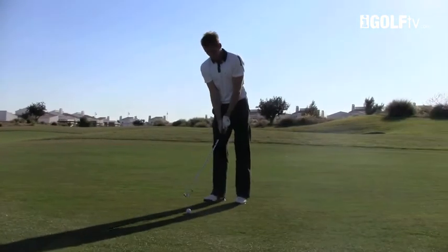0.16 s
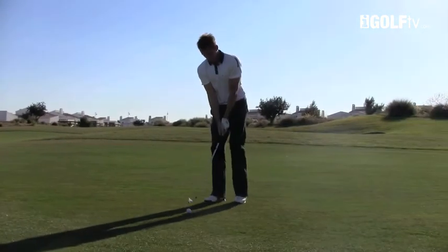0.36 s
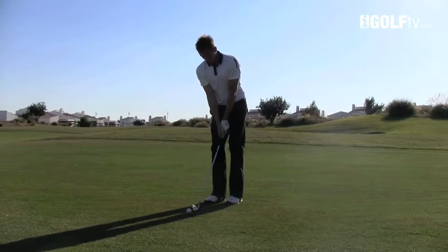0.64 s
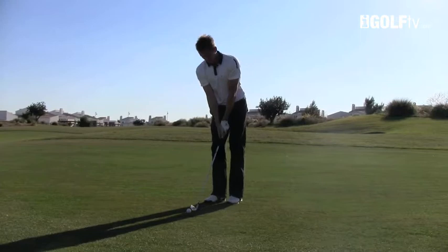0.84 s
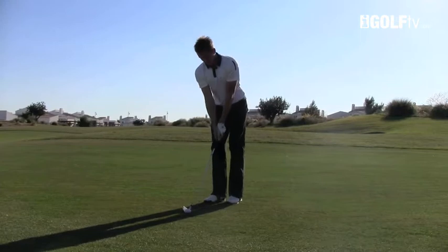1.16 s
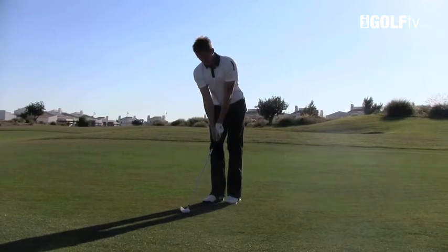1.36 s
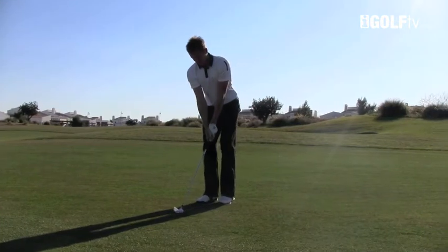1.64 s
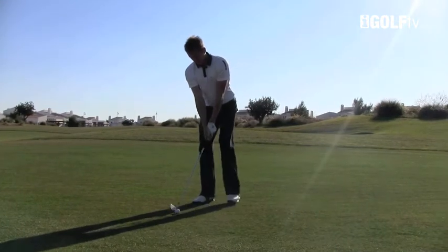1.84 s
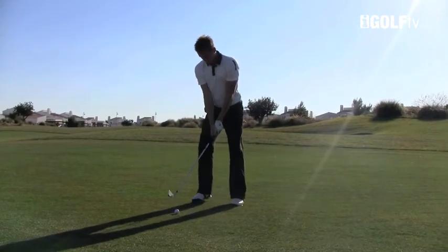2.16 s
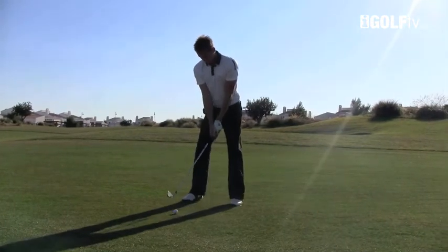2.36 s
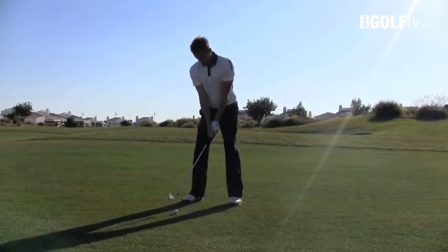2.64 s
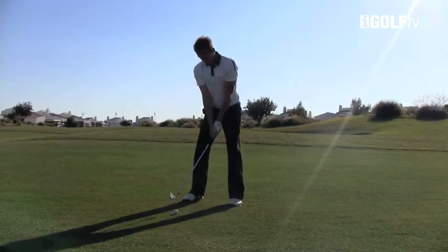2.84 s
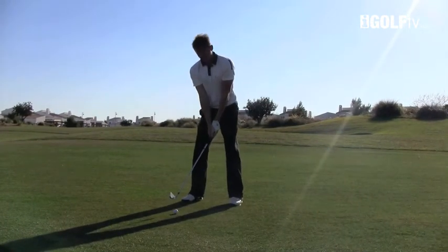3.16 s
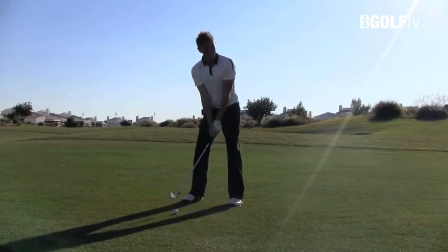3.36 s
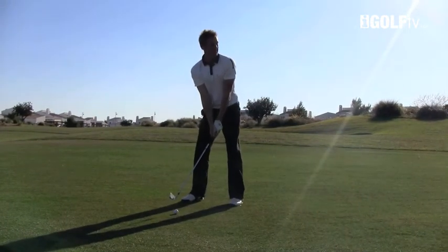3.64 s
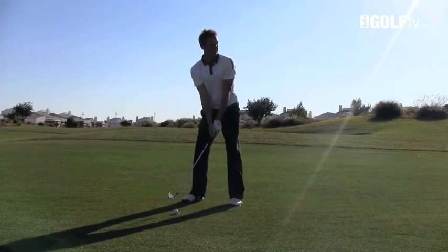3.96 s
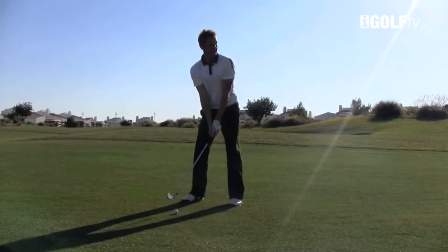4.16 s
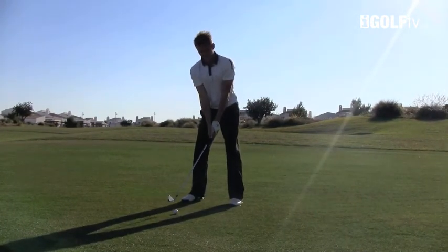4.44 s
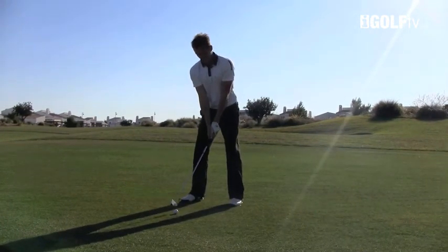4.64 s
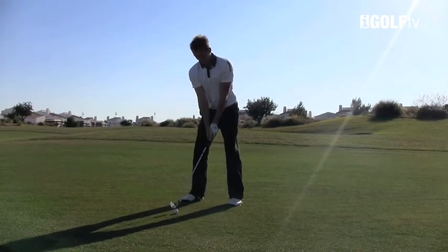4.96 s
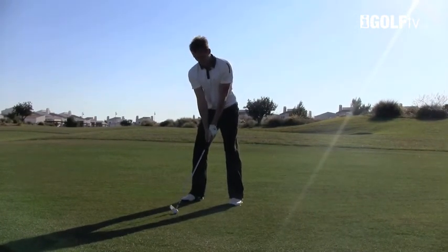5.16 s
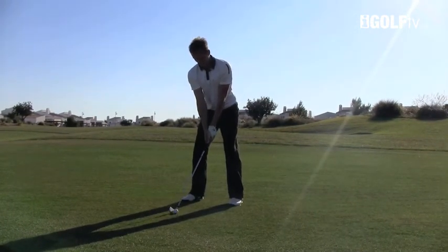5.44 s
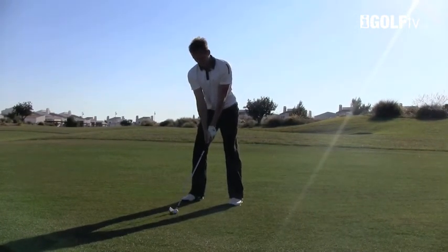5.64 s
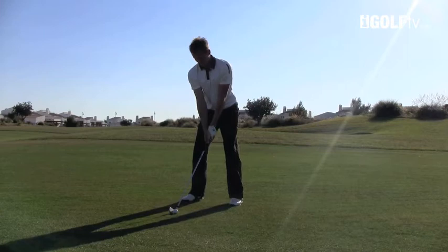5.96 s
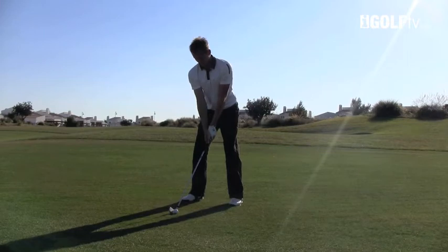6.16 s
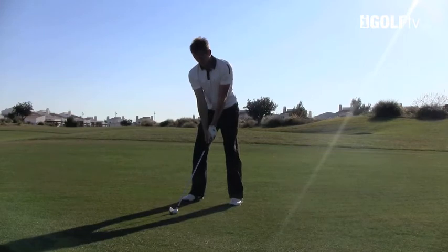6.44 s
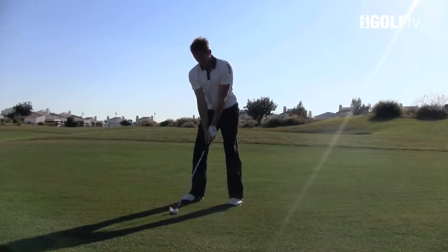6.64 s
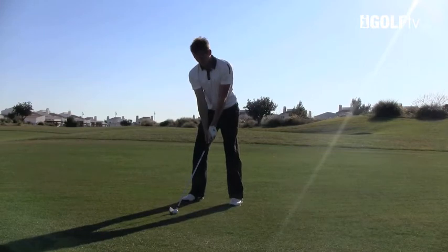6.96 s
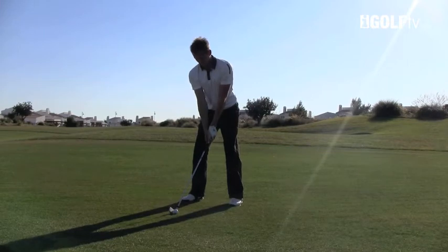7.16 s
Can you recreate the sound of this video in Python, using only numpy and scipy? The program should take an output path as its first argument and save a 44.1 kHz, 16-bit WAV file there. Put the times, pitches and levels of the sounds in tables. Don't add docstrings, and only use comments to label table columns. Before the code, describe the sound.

A small microphone on a golfer's shirt picks up deep, uneven wind rumble from start to finish. Tiny ticks open it, then cloth rubs and dull knocks, shoes brush the turf, and a rubber grip squeaks thinly under a glove. Around two and a half seconds stronger gusts thump. Later movement settles, a far bird rasps faintly, and wind and hiss carry on in the open field, with no shot struck.

```python
import sys
import numpy as np
from scipy import signal
from scipy.fft import rfft, irfft, next_fast_len
from scipy.io import wavfile
from scipy.ndimage import uniform_filter1d

SR = 44100
rng = np.random.default_rng(int(sys.argv[2]) if len(sys.argv) > 2 else 0)


def log_audio(samples):
    frames = np.atleast_2d(samples).T
    limited = np.clip(frames, -1, 1)
    pcm = np.round(limited * 32767).astype(np.int16)
    wavfile.write(sys.argv[1], SR, pcm)


def natural_amplitude(level_db):
    exponent = np.asarray(level_db, float) / 20
    return 10 ** exponent


N = 322371
TIME = np.arange(N) / SR


def level(x, db):
    return x * natural_amplitude(db) / np.sqrt(np.mean(x ** 2))


def colour(x, points):
    hz, db = np.transpose(points)
    size = next_fast_len(len(x))
    freq = np.maximum(np.fft.rfftfreq(size, 1 / SR), 1)
    gain = natural_amplitude(np.interp(np.log(freq), np.log(hz), db))
    return irfft(rfft(x, size) * gain, size)[:len(x)]


def band(x, hz, width):
    edges = np.clip([hz - width / 2, hz + width / 2], 20, 0.45 * SR)
    return signal.sosfilt(signal.butter(2, edges, "bandpass", fs=SR, output="sos"), x)


def walk(rate):
    hold = int(SR / rate)
    steps = np.repeat(rng.standard_normal(N // hold + 1), hold)
    steps = uniform_filter1d(uniform_filter1d(steps, hold), hold)[:N]
    return steps / steps.std()


def even(x, span_s):
    span = int(span_s * SR)
    power = uniform_filter1d(uniform_filter1d(x ** 2, span), span)
    return x / np.sqrt(power + 1e-18)


def curves(table):
    s, *columns = np.transpose(table)
    return [np.interp(TIME, s, column) for column in columns]


def add(out, start_s, piece):
    at = int(start_s * SR)
    out[at:at + len(piece)] += piece[:N - at]


def fibres(spread_db):
    return rng.standard_normal(N) * natural_amplitude(spread_db * rng.exponential(size=N))


def wind():
    # (time [s], wind strength [dB], share of small eddies [dB])
    gusts = [(0.0, -39.5, -3), (0.35, -34, -4), (0.65, -46.5, -5.5), (0.89, -37, -2), (2.32, -36.5, -1),
             (2.5, -29, 5), (2.89, -35.5, -1), (3.09, -32, 2.5), (3.36, -35.5, -2), (3.7, -33.5, 1.5),
             (4.17, -42.5, -0.5), (5.48, -32.5, 1), (5.6, -42, 1.5), (5.84, -31.5, -1), (6.19, -33.5, -4),
             (6.6, -33, 2), (6.94, -36.5, 2.5), (7.31, -38.5, 2)]
    # (frequency [Hz], density [dB per Hz])
    wind_spectrum = [(8.8, -38), (15, -5), (38, 5.5), (75, 0.5), (140, -10), (380, -32.5), (700, -51),
                     (910, -51), (1540, -120)]
    # (middle [s], length [s], large eddies [dB], smaller eddies [dB])
    lulls = [(0.267, 0.29, 0, 8.5), (1.05, 0.19, -3.5, -8), (1.3, .15, -1, -1), (1.444, 0.13, -6, -0.5),
             (1.66, 0.056, -2, -3), (1.78, 0.11, -1.5, 3), (1.994, 0.068, -5.5, -6),
             (2.162, 0.069, -6, -10), (2.75, .1, -6, 4), (2.918, 0.093, -7, -5), (3.37, 0.062, -8, 0),
             (3.665, 0.094, -2, 2), (3.74, 0.05, -11, -1), (4.05, 0.091, 0, -2), (4.28, 0.11, -4.5, -3),
             (4.49, 0.073, -1.5, 5.5), (4.735, 0.072, -7, -8), (4.85, .12, -5, 4.5), (5.022, .1, 1.5, -4.5),
             (5.327, 0.16, -7.5, -6.5), (5.447, 0.089, 3.5, -5.5), (5.69, .1, 3, 3), (5.927, 0.069, -4, -7),
             (6.16, 0.15, -5.5, -4), (6.306, 0.061, -6, -4), (6.452, 0.13, -3.5, 2.5),
             (6.602, 0.11, 1.5, -3.5), (6.704, 0.12, 1, -5.5), (6.842, .1, -0.5, 1.5), (6.967, 0.2, -1, -6)]
    # (large to middle [Hz], middle to small [Hz])
    eddy_split_hz = (90, 200)

    gust_db, fine_db = curves(gusts)
    middle_s, length, large_db, small_db = np.transpose(lulls)[:, :, None]
    coarse = TIME[::64]
    bell = np.exp(-(2 * (coarse - middle_s) / length) ** 2)
    large_db = np.interp(TIME, coarse, (large_db * bell).sum(axis=0))
    small_db = np.interp(TIME, coarse, (small_db * bell).sum(axis=0))

    air = colour(rng.standard_normal(N) * natural_amplitude(3.2 * walk(32)), wind_spectrum)
    low, below = (signal.sosfiltfilt(signal.butter(3, hz, fs=SR, output="sos"), air) for hz in eddy_split_hz)
    large = even(low, 0.083) * natural_amplitude(-0.55 + large_db + 0.77 * walk(14))
    middle = even(below - low, 0.062) * natural_amplitude(-6 + small_db + 0.7 * fine_db + 0.5 * walk(11))
    small = even(air - below, 0.049) * natural_amplitude(-17.5 + 0.54 * small_db + fine_db + 2.0 * walk(20))
    return natural_amplitude(gust_db) * (large + middle + small)


def cloth():
    # (time [s], level [dB])
    stir = [(0.05, -56.5), (0.76, -59.5), (1.14, -53.5), (1.4, -63), (1.67, -62), (1.97, -55.5),
            (2.56, -57.5), (2.86, -60), (3.22, -62.5), (3.55, -58), (4.07, -65.5), (4.8, -68.5),
            (5.31, -63), (5.89, -76), (7.31, -68)]
    # (time [s], level [dB])
    breeze = [(0, 1.5), (.75, 0), (1.4, 4), (1.95, -1), (2.25, 0.5), (2.9, -3), (3.55, 1), (4.05, -4),
              (4.4, 2), (4.75, -1), (5.9, -0.5), (6.5, 2), (6.9, -3), (7.31, 2.5)]
    swish_db = -5
    grass_db, leaves_db = -66.5, -68

    (stir_db,), (breeze_db,) = curves(stir), curves(breeze)
    dull = even(band(fibres(2.26), 667, 674), 0.25) * natural_amplitude(stir_db - 2.5 + 1.05 * walk(24.89))
    ring = level(band(rng.standard_normal(N), 754, 99), -10.5) * natural_amplitude(stir_db)
    swish = np.hypot(natural_amplitude(stir_db + swish_db), natural_amplitude(grass_db + breeze_db))
    bright = level(band(fibres(1.97), 3740, 4950), -4.5) * swish * natural_amplitude(1.6 * walk(12))
    leaves = level(band(fibres(2.5), 10000, 7800), -6.0) * natural_amplitude(leaves_db + 1.5 * breeze_db + 0.6 * walk(11))
    return dull + ring + bright + leaves


def hiss():
    # (frequency [Hz], density [dB per Hz])
    shared_spectrum = [(180, -20), (300, -21), (418, -7.5), (644, -7.5), (6600, -18.5), (15100, -24),
                       (15900, -25)]
    # (frequency [Hz], density [dB per Hz])
    wide_spectrum = [(29, -71), (50, -41), (103, -8), (144, -15), (188, -9.5), (388, -0.5), (970, -1.5),
                     (2050, -4), (5780, -4.5), (12500, -7.5), (14400, -8), (15900, -34)]
    # (frequency [Hz], rms level [dB])
    whines = [(6725, -86.5), (13426, -97), (15625, -86)]

    shared = level(colour(rng.standard_normal(N), shared_spectrum), -59.5)
    for hz, db in whines:
        shared = shared + np.sqrt(2) * natural_amplitude(db) * np.sin(2 * np.pi * hz * TIME)
    wide = level(colour(rng.standard_normal(N), wide_spectrum), -66.5)
    return shared + wide * np.array([[1], [-1]])


def puffs(table, spread_db):
    out, grit = np.zeros(N), fibres(spread_db)
    for start, length, db, hz, width in table:
        at, count = int(start * SR), int(length * SR)
        piece = band(band(grit[at:at + count], hz, width), hz, 2 * width)
        piece = level(even(piece, 0.017), db)
        add(out, start, piece * np.hanning(count)[:len(piece)])
    return out


def scuffs():
    # (start [s], length [s], level [dB], centre [Hz], width [Hz])
    brushes = [(.014, 0.024, -51.5, 6000, 5980), (.576, 0.025, -49, 380, 250), (.586, 0.04, -51, 940, 600),
               (.59, 0.042, -53, 620, 350), (.98, 0.22, -67, 5800, 1600), (1.88, 0.035, -64, 4500, 2500),
               (1.955, 0.033, -53.5, 3950, 2000), (1.965, 0.055, -59.5, 5200, 3000),
               (1.99, .012, -55, 3180, 900), (2.02, 0.067, -52.5, 780, 900),
               (2.58, 0.071, -63.5, 5800, 3000), (2.72, 0.073, -56, 800, 900), (3.02, 0.032, -54, 800, 900),
               (1.98, 0.17, -63, 4500, 4000), (2.12, 0.27, -67, 4500, 4500)]
    return puffs(brushes, 1.7)


def taps(table):
    out, t = np.zeros(N), TIME[:SR // 20]
    contact_cycles = 0.55
    for start, db, hz, t60, crack_db in table:
        modes = np.sin(2 * np.pi * hz * t) + 0.35 * np.sin(2 * np.pi * 0.74 * hz * t)
        ring = modes * np.exp(-np.log(1000) * t / t60)
        build = 1 - np.exp(-hz * t / contact_cycles)
        crack = np.sin(2 * np.pi * 1.77 * hz * t) * np.exp(-1.6 * hz * t)
        add(out, start, natural_amplitude(db + 3.5) * ring * build + natural_amplitude(crack_db + 8.0) * crack)
    return out


def ticks():
    # (time [s], peak [dB], ring [Hz], ring t60 [s], crack of first contact [dB])
    contacts = [
        (.0186, -37, 5360, 0.0045, -46),
        (.0293, -37, 4300, 0.0033, -50),
        (.0326, -34.5, 5000, .003, -50),
        (.0330, -35, 7000, 0.002, -38),
        (.0968, -51, 3130, 0.0053, -64),
        (7.2925, -42, 3400, .004, -58),
    ]
    return taps(contacts)


def thumps():
    # (time [s], peak [dB], size as frequency [Hz])
    pushes = [(.098, -31, 90), (2.405, -21, 95), (2.5, -21.5, 79), (2.567, -24.5, 70), (2.634, -25, 69.6),
              (3.075, -19.5, 111), (3.205, -22.5, 79), (5.76, -23, 59), (5.847, -25.5, 64),
              (5.981, -24.5, 49.4), (6.022, -25, 75)]
    out, t = np.zeros(N), TIME[:SR // 20] - 1 / 40
    for start, db, hz in pushes:
        turn = (np.pi * hz * t) ** 2
        add(out, start - 1 / 40, natural_amplitude(db + 2.0) * (1 - 2 * turn) * np.exp(-turn))
    return out


def knocks():
    # (time [s], peak [dB], ring [Hz], ring t60 [s], crack of first contact [dB])
    bumps = [(.5975, -40.5, 950, .012, -64), (.609, -43, 850, .012, -66), (1.772, -43, 726, 0.013, -60),
             (1.9425, -26.5, 830, 0.0083, -59), (2.425, -44, 600, 0.02, -64), (2.514, -38, 577, .015, -60),
             (2.556, -41, 600, .012, -62), (2.839, -42, 660, 0.018, -62), (2.9525, -35, 1000, 0.0043, -50),
             (3.02, -46, 905, 0.021, -60), (3.29, -38, 1000, .005, -53), (3.399, -43, 650, 0.018, -50),
             (3.671, -47, 540, .012, -62)]
    return taps(bumps)


def squeaks():
    # (start [s], length [s], pitch [Hz], level [dB], rise [Hz])
    slips = [
        (.715, .026, 2960, -66.5, -30),
        (.736, .028, 2990, -67, 190),
        (.762, .027, 3000, -68, -30),
        (.94, .026, 3150, -71, 70),
        (.975, .04, 3140, -70, 110),
        (1.008, .036, 3150, -68.5, -60),
        (1.054, .042, 3540, -61.5, 120),
        (1.092, .038, 3530, -62, 70),
        (1.32, .03, 3540, -70, 70),
        (1.58, .05, 3930, -74, 100),
    ]
    edge_s, waver_db = 0.006, 1.4
    out, waver, wobble = np.zeros(N), walk(91), walk(60.9)
    for start, length, hz, db, rise_hz in slips:
        along = np.clip((TIME - start) / length, 0, 1)
        edge = np.clip(np.minimum(along, 1 - along) * length / edge_s, 0, 1)
        pitch = (hz + rise_hz * np.sin(np.pi * along) ** 2) * (1 + 0.0036 * wobble)
        whistle = np.sin(2 * np.pi * np.cumsum(pitch) / SR)
        out += edge * natural_amplitude(db + 3.5 + waver_db * waver) * whistle
    return out


def rasps():
    # (start [s], length [s], level [dB], centre [Hz], width [Hz])
    calls = [
        (4.06, 0.14, -66.5, 1800, 450),
        (4.31, 0.42, -66, 1930, 140),
        (4.3, .3, -67, 2000, 590),
        (4.75, 0.33, -65, 1920, 700),
        (5.24, 0.11, -69, 1950, 250),
    ]
    return puffs(calls, 1.5)


def scene():
    near = wind() + thumps() + cloth() + knocks() + ticks() + scuffs() + squeaks()
    return near + rasps() + hiss()


def top_cut(x):
    return signal.sosfilt(signal.butter(12, 16060, fs=SR, output="sos"), x)


def record(dry):
    top_hz = 15690
    cut = signal.sosfilt(signal.ellip(12, 0.2, 70, top_hz, fs=SR, output="sos"), dry)
    return top_cut(cut)


dry = scene()
out = record(dry)
log_audio(out)
```